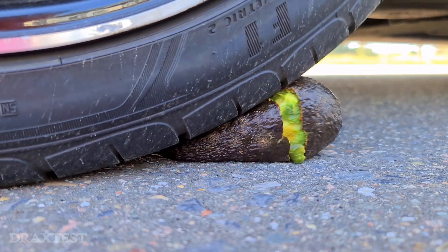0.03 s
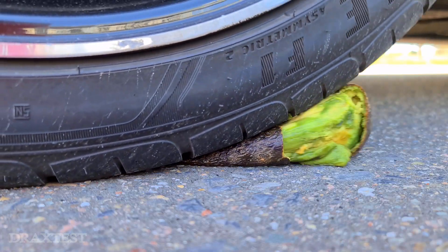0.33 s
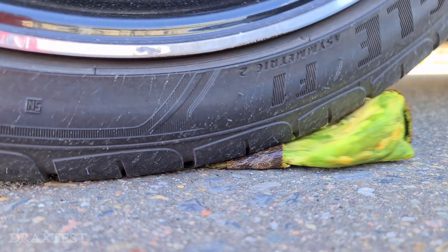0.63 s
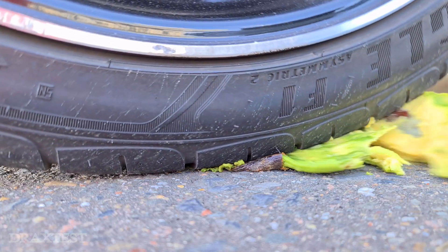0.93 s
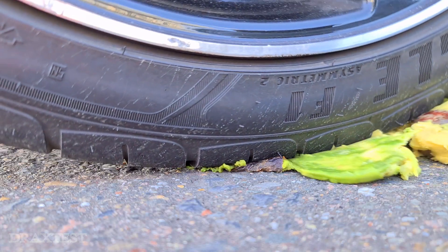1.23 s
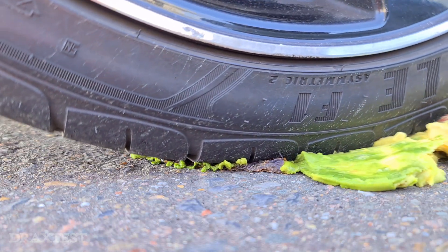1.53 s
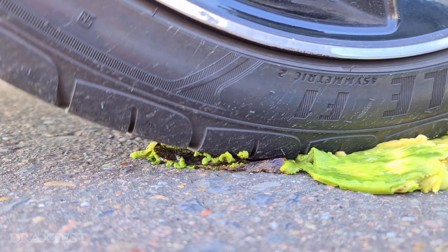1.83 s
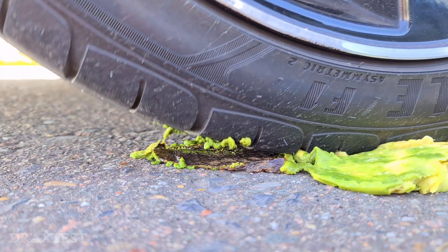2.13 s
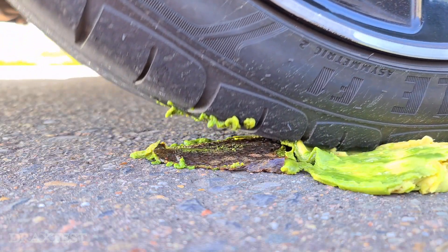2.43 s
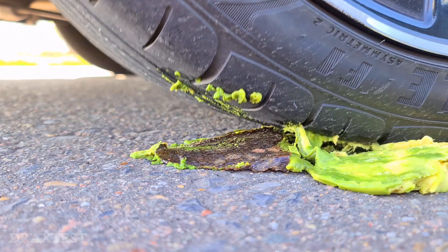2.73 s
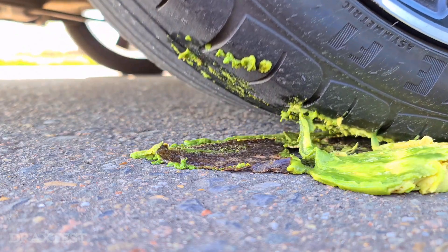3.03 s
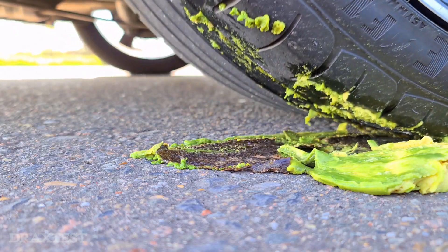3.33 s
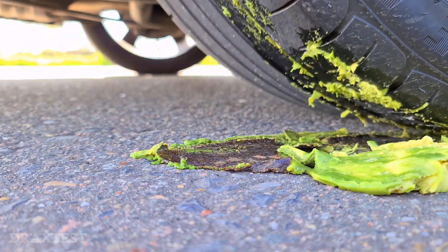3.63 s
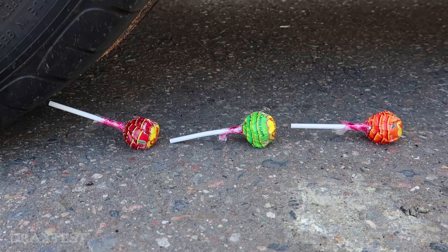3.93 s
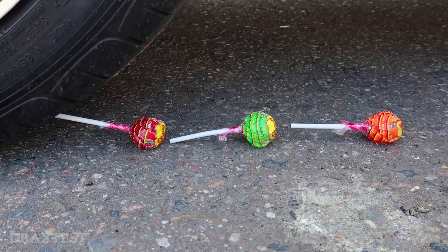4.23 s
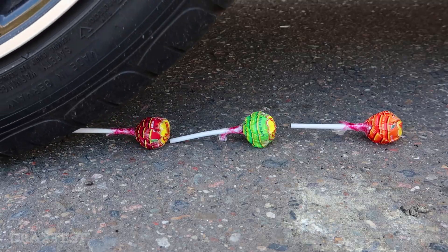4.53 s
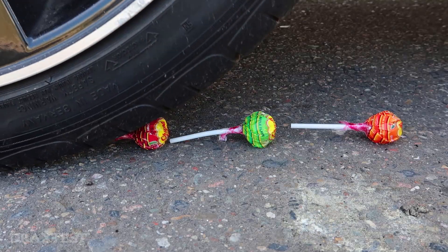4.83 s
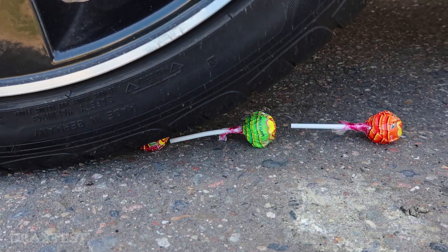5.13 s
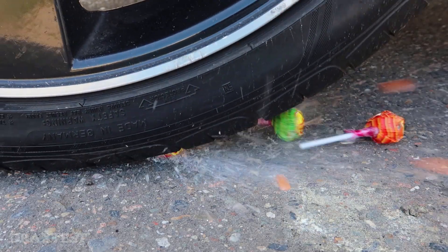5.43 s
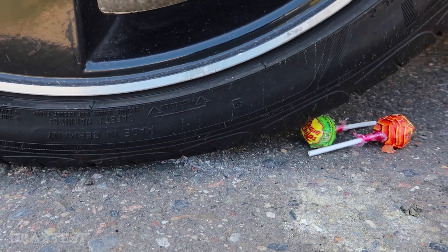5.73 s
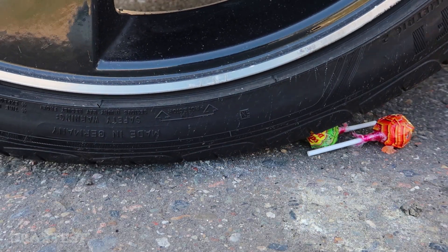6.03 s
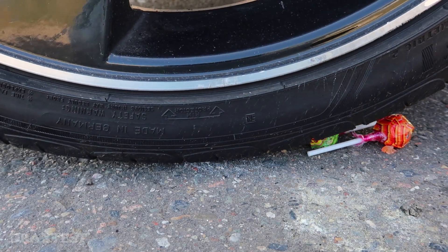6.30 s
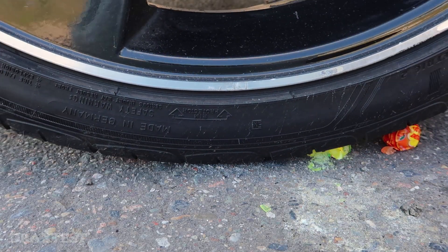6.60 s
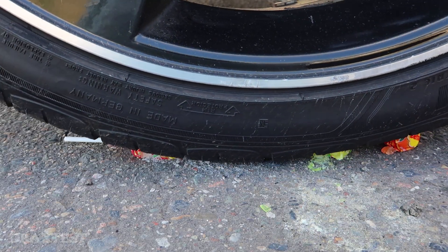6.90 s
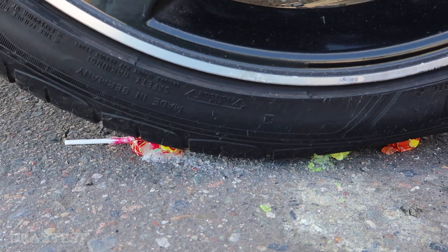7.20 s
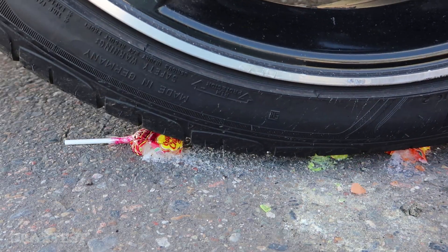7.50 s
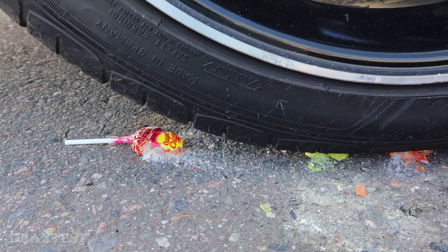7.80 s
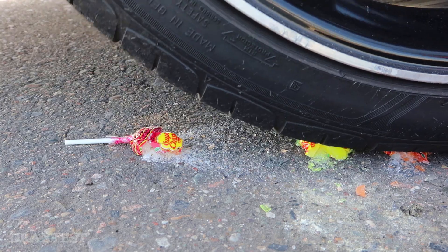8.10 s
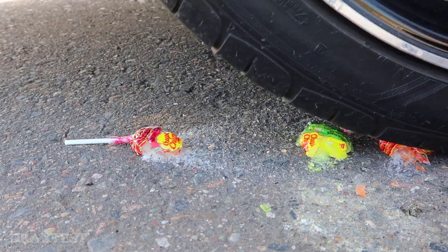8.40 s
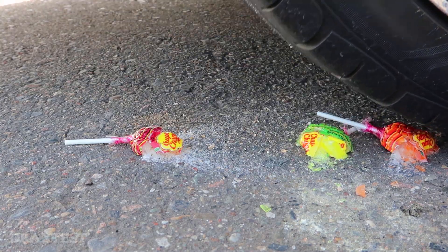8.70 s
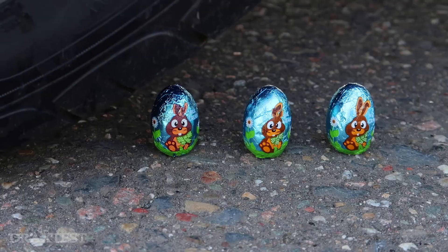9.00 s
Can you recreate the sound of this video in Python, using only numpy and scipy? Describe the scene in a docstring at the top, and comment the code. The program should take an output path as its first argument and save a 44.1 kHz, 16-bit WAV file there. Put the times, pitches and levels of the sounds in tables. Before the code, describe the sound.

A slow car tyre squelches over an avocado, then cracks and bursts wrapped lollipops with loud thumps, over a low engine rumble.

```python
"""A car crushes an avocado and lollipops

A car creeps over things laid on asphalt, heard from beside the tyre, in three parts.
First an avocado squelches and its pulp pops on the tread, over the hum of the engine.
Then three lollipops crack and burst in their wrappers; each burst thumps the tyre, rings it
and overloads the microphone. The last part is a brief rumble of the car."""
import sys
import numpy as np
from scipy import signal
from scipy.fft import rfft, irfft, next_fast_len
from scipy.io import wavfile
from scipy.ndimage import uniform_filter1d

SR = 44100
rng = np.random.default_rng(int(sys.argv[2]) if len(sys.argv) > 2 else 0)


def file_out(sig):
    """Save sig as 16-bit WAV at sys.argv[1]."""
    # one column per channel
    cols = np.atleast_2d(sig).T
    # limit, then scale
    lim = np.clip(cols, -1, 1)
    pcm = np.round(lim * 32767).astype(np.int16)
    wavfile.write(sys.argv[1], SR, pcm)


N = 403515
TIME = np.arange(N) / SR
SWEETS_START_S, ENDING_START_S = 3.99, 9.03
ENGINE_HZ = 25  # engine cycles per second

# Levels in the tables are relative: they compare rows; the functions set the final loudness.
# tone of the car and air noise (first part, two layers of the second, last part): f/Hz, level/dB
RUMBLE_TONE = [(15, -15), (30, -5.5), (45, -0.5), (62, 4), (85, -1.5), (125, -7.5), (160, -15.5),
               (330, -18), (750, -20), (1400, -30), (1800, -30), (2250, -38), (2700, -48), (6000, -57.5),
               (16000, -78)]
WASH_TONE = [(20, -30.5), (60, -5), (102, 2), (145, -4.5), (200, -5.5), (300, -8), (700, -7), (1200, -13),
             (1900, -21.5), (3900, -34.5), (12000, -48), (16000, -49.5)]
HUSH_TONE = [(20, -23.5), (60, -6.5), (105, -3), (200, -5), (400, -12), (800, -12.5), (1500, -25.5),
             (2700, -34.5), (5300, -45), (12000, -51.5), (16000, -61.5)]
ENDING_TONE = [(15, -54), (25, -33), (76, -0.5), (373, -1), (503, -16), (624, -5), (840, -17), (1130, -17),
               (11300, -59), (16000, -93)]
# the wash sinks after the first sweet bursts, then partly returns: t/s, level/dB
WASH_LEVEL = [(4.7, -0.4), (5.48, 2.5), (5.62, -18), (5.9, -28.5), (8.2, -28.5), (8.6, -12), (9.0, -12.5)]
# stereo width with the avocado and with the sweets: f/Hz, side minus middle/dB
AVOCADO_WIDTH = [(60, -25), (110, -25), (200, -11.5), (380, -13), (700, -1), (1290, 6), (2400, -4),
                 (8000, 2.5)]
SWEETS_WIDTH = [(200, -61), (380, -33.5), (700, -23.5), (1290, -11), (2380, -7.5), (4400, -0.5), (8000, 2)]
# tones of the engine: multiple of ENGINE_HZ, level/dB
HUM_TONES = [(4, -39.5), (5, -52.5), (8, -55.5), (10, -58), (12, -64)]
# faint whines of the car: f/Hz, level/dB, waver/Hz, start t/s
WHINES = [(1736, -65, 75, 0), (2150, -76, 108.5, -1), (2220, -68, 40, 2), (3760, -79, 55, 2.6)]
# the pulp fizzes less as it is squeezed flat: t/s, level/dB
FIZZ_LEVEL = [(0, -50), (.15, -55.5), (.9, -53), (1.1, -61.5), (2.25, -61), (2.55, -68), (3.15, -64),
              (3.5, -73.5), (3.9, -79)]
# tone of the fizzing and of the squelching pulp: f/Hz, level/dB
FIZZ_TONE = [(1000, -5), (2000, 9), (3000, -0.5), (4500, 2), (7000, -4.5), (12000, -2), (16000, -6)]
SQUELCH_TONE = [(500, -5), (1100, 6), (1800, 16.5), (2400, 13), (3200, -55), (8000, -40)]
# flesh squelches out of its skin, later off the tread: t/s, level/dB, rise/s, fall/s
SQUELCH_SWELLS = [(.3, -55, .5, 1.2), (.87, -48.5, 0.081, 0.27), (2.78, -54, .03, 0.07),
                  (3.13, -57, .03, .1), (3.7, -63, .4, 0.44)]
# larger air pockets popping in the pulp: t/s, level/dB, f/Hz, spray/dB
BIG_POPS = [(.0075, -23, 5400, -25), (.024, -14.5, 9600, -47), (.157, -29, 1850, -52),
            (.2013, -21.5, 13900, -48), (.2382, -26, 1790, -48), (.2619, -22.5, 11310, -42),
            (.5913, -26, 6400, -45), (.6673, -26.5, 11350, -40), (.6792, -27.5, 2200, -50),
            (.6885, -31, 6050, -46), (.7214, -27, 10450, -43), (.8488, -22.5, 11500, -44),
            (1.0111, -20, 8650, -32), (1.0304, -22.5, 10000, -57), (1.0736, -30, 1860, -55),
            (1.2022, -21, 10990, -52), (1.2428, -22, 6460, -34), (1.3789, -21, 3040, -39),
            (1.468, -30, 10350, -32), (1.9104, -27, 10000, -41), (2.0278, -23.5, 12120, -56),
            (2.1005, -38, 9720, -35), (2.146, -20.5, 6660, -48), (2.289, -26, 2560, -29.5),
            (2.3472, -27, 3900, -61), (2.5653, -25.5, 3020, -61), (2.753, -29.5, 4280, -44.5),
            (3.026, -33, 6840, -53), (3.1237, -40, 2560, -41.5), (3.525, -40, 2700, -48.5),
            (3.6833, -34.5, 8150, -44), (3.7198, -29, 9500, -36), (3.7987, -24, 1600, -37)]
# echoes under the car: f/Hz, time to fade by 60 dB/s
ECHO_FADE = [(150, 0.36), (400, 0.051), (1000, .11), (2500, 0.048), (6000, 0.061), (15000, 0.055)]
# the tread catches wrappers or lets them go: t/s, level/dB, rise/s, fall/s
WRAPPER_SWELLS = [(5.03, -50, 0.18, 0.92), (6.1, -71, .6, 0.84), (6.85, -58.5, 0.37, 0.27),
                  (7.57, -66, 0.23, 1.6), (8.25, -66.5, 0.63, 0.23), (8.61, -46.5, 0.047, 0.24)]
# the first sweet sheds powder inside its wrapper: t/s, level/dB, fall/s
POWDER_SPURTS = [(4.995, -40.5, 0.15), (5.11, -53, 0.034), (5.165, -41.5, 0.021), (5.305, -41, .24),
                 (5.47, -41, .05)]
# tone of the wrappers, the crumbling sugar and the powder: f/Hz, level/dB
WRAPPER_TONE = [(500, -12), (1100, 6), (2500, 5), (4000, 1), (7000, -7.5), (12000, -9), (16000, -25)]
SUGAR_TONE = [(400, -7), (1000, 4.5), (2400, 5.5), (4000, -5), (7000, -12.5), (16000, -27)]
SIZZLE_TONE = [(700, -10.5), (1500, -2), (3000, -1), (6000, -2), (13000, 0), (16000, -5.5)]
# hard sugar cracking: t/s, level/dB, f/Hz, splinters/dB, thud/dB
SUGAR_CRACKS = [(4.9787, -16.5, 1980, -40, -45), (5.1058, -15, 10200, -44, -58),
                (5.161, -18.5, 10200, -33, -49), (5.2979, -14.5, 2480, -13.5, -39),
                (5.3035, -18.5, 3220, -14, -39.5), (5.462, -18, 1240, -27, -36),
                (5.5516, -18, 2130, -38, -56), (5.5646, -13.5, 1020, -27.5, -58),
                (5.8151, -35, 1130, -47.5, -51.5), (6.0672, -3, 1083, -29, -31),
                (6.1393, -40, 2870, -46.5, -62), (6.4598, -28, 2490, -28, -35.5),
                (6.4988, -4.5, 990, -28.5, -18.5), (6.523, -21.5, 960, -38, -66.5),
                (6.6949, -16, 1770, -55, -37.5), (6.8946, -10.5, 1340, -41, -38.5),
                (6.956, -40.5, 3390, -44.5, -76), (6.995, -34.5, 2650, -46, -73),
                (7.1065, -36.5, 1670, -72.5, -76), (7.274, -36.5, 1870, -69, -66),
                (7.3934, -9.5, 1360, -22, -33.5), (7.5108, -31.5, 2180, -42, -66),
                (7.6678, -22, 1283, -50, -41), (7.6738, -26, 1900, -58, -65), (7.7524, -26, 1300, -56, -61),
                (7.8086, -25, 1440, -51, -61), (7.8535, -27, 1345, -49.5, -64),
                (7.9425, -29.5, 1530, -45, -54.5), (8.0265, -33.5, 4830, -57.5, -64),
                (8.1112, -30.5, 1040, -68, -68.5), (8.1711, -2.5, 1100, -30.5, -32.5),
                (8.3283, -21.5, 1290, -57, -53), (8.3428, -26.5, 1067, -64, -66),
                (8.4107, -10, 1330, -41, -28), (8.4469, -9, 1640, -33.5, -34),
                (8.4661, -4, 1090, -24.5, -19.5), (8.5109, -5, 1050, -37, -27.5),
                (8.5256, -2.5, 1180, -33, -23.5), (8.5342, -15.5, 1350, -46, -51.5),
                (8.5692, -22, 1300, -38, -72), (8.6336, -29, 3373, -36, -63),
                (8.7495, -33, 2527, -42.5, -72)]
# notes of the tyre's walls and the air inside: f/Hz, level/dB, time to fade by 60 dB/s
TYRE_NOTES = [(144, -15, 2.1), (208.7, 1, 0.64), (230, -13, 0.88), (298, -11, 1.4), (357, -9, 1.3),
              (399.6, 2.5, .42), (467, -1, 0.54), (583, 1, .48), (626, -16.5, .33), (711, -14, .48),
              (786, -.5, .6), (851, -10, .5), (925, -3, .55), (1123, -4, 0.41), (1325, -14.5, .24)]
# a sweet gives way and the tyre drops: t/s, level/dB, f/Hz, shards/dB, thud/dB, air push/dB, ring/dB
SWEET_BURSTS = [(5.2986, -9.5, 900, -25.5, -35.5, -45, -52), (5.4847, 6, 1094, -4, -17.5, -31, -26),
                (5.487, -0.5, 1330, -18, -20, -34.5, -35), (5.4930, 4.5, 540, -3.5, -9, -19.5, -23.5),
                (5.4962, 5.5, 1402, -17, -14, -20, -29.5), (5.499, 4.5, 417.3, -34.5, -5, -17, -21),
                (6.4681, 5, 923, -10, -12.5, -28, -25), (7.4177, 5, 997, -11, -24, -24, -42),
                (7.4178, 3, 474, -30, -19, -19.5, -21.5)]
# tone of the wedge of air between tyre and road: f/Hz, level/dB
WEDGE_TONE = [(150, 0), (210, 1), (300, 0), (440, 0), (650, 0.5), (1100, -2), (1700, -5.5), (2300, 1.5),
              (3050, 2), (3750, 2), (5000, -1.5), (9000, -2.5), (16000, 0.5)]
# the last cracks lie to the right: t/s, level gained right and lost left/dB
RIGHT_LEAN = [(7.5, 0), (8.15, .55)]


def gain_of(db):
    """Turns decibels into a factor to multiply by."""
    return 10 ** (np.asarray(db) / 20)


def read(points, hz):
    """Looks up a frequency in a table, on a scale of octaves."""
    freqs, values = np.transpose(points)
    return np.interp(np.log(hz + 1), np.log(freqs + 1), values)


def level(rows):
    """Turns rows of time and decibels into a gain for every sample."""
    return gain_of(np.interp(TIME, *np.transpose(rows)))


def between(start, end):
    """1 between two times and 0 outside, with short fades."""
    return uniform_filter1d(1. * ((TIME >= start) & (TIME < end)), size=400)


def swell(s, db, rise, fall, hold=0):
    """Climbs to db at time s, holds and sinks; rise and fall are the seconds for 20 dB."""
    away = np.maximum(s - TIME, 0) / rise + np.maximum(TIME - s - hold, 0) / fall
    return gain_of(db - 20 * np.minimum(away, 10))


def add(mix, s, sound):
    """Mixes a sound in at time s."""
    part = mix[:, max(round(s * SR), 0):][:, :sound.shape[-1]]
    part += sound[..., :part.shape[1]]


def drift(rate_hz):
    """A random wander with a typical size of 1."""
    knots = rng.standard_normal(4000)
    wander = np.interp(TIME * rate_hz, np.arange(len(knots)), knots)
    return wander / np.sqrt(np.mean(wander ** 2))


def coloured(pair, tone, width):
    """Shapes two unrelated signals into stereo: a middle both ears share and a side they hear opposed."""
    size = next_fast_len(N)
    hz = np.fft.rfftfreq(size, 1 / SR)
    mid_db = read(tone, hz)
    gains = gain_of([mid_db, mid_db + read(width, hz)])
    mid, side = irfft(rfft(pair, size) * gains, size)[:, :N]
    return np.array([mid + side, mid - side]) / np.std(mid)


def low_cut(x, hz):
    """Turns down what lies below hz."""
    return signal.sosfilt(signal.butter(2, hz, "high", fs=SR, output="sos"), x)


def snap(t, hz, cycles, rise):
    """A sudden release that swings briefly; its fade and rise are counted in cycles."""
    turns = np.maximum(t, 0) * hz
    swing = np.sin(2 * np.pi * turns) * np.exp(-turns / cycles) * (1 - np.exp(-turns / rise))
    return -swing / (abs(swing).max() + 1e-12)


def puff(t, low_hz, high_hz, decay_s, channels=1):
    """A dying burst of noise between two frequencies."""
    band = signal.butter(2, [low_hz, high_hz], "band", fs=SR, output="sos")
    noise = rng.standard_normal((channels, len(t)))
    return signal.sosfilt(band, noise * np.exp(-t / decay_s)) / np.sqrt(2 * (high_hz - low_hz) / SR)


def grains(per_s, spread_db, low_hz, high_hz, cycles):
    """Countless tiny snaps of many pitches, mostly faint, as middle and side."""
    t, out = np.arange(300) / SR, np.zeros((2, N))
    for hz in np.geomspace(low_hz, high_hz, num=16):
        when, chance, place = rng.random((3000, 3))[:int(per_s * N / SR / 16)].T
        size = gain_of(spread_db * np.minimum(-np.log(chance), 4))
        size *= rng.choice([-1, 1], 3000)[:len(size)]
        samples = (when * (N - len(t))).astype(int)[:, None] + np.arange(len(t))
        grain = snap(t, hz, cycles, rise=0.11) * hz
        for channel, share in enumerate([np.cos(np.pi * place), np.sin(np.pi * place)]):
            out[channel] += np.bincount(samples.ravel(), np.outer(size * share, grain).ravel(), N)
    return out


def sprinkle(start, end, per_s, db, spread_db, low_hz, high_hz):
    """Chance events over a stretch of time, as rows of t/s, level/dB, f/Hz."""
    when, chance, pitch = rng.random((200, 3))[:int(per_s * (end - start))].T
    times = start + (np.arange(len(when)) + when) / per_s
    levels = db + spread_db * np.minimum(-np.log(chance) - 1, 2)
    return zip(times, levels, low_hz * (high_hz / low_hz) ** pitch)


def echoes(x, stretch, width=SWEETS_WIDTH):
    """Sound bounces between road, tyre and car; stretch multiplies the time it takes to fade."""
    hz, t, bands = signal.stft(rng.standard_normal((2, SR // 3)), SR, nperseg=128)
    bands *= gain_of(-60 * t / (stretch * read(ECHO_FADE, hz)[:, None]))
    bands[1] *= gain_of(read(width, hz))[:, None]
    mid, side = signal.istft(bands, SR, nperseg=128)[1]
    tail = np.array([mid + side, mid - side]) / np.linalg.norm(mid)
    delayed = np.pad(tail, ((0, 0), (50, 0)))
    return signal.fftconvolve(x, delayed, axes=1)[:, :N]


def car_and_air():
    """The car and the open air rumble and hiss, with their own tone in each part."""
    def noise(tone, db, width=SWEETS_WIDTH):
        return gain_of(db) * coloured(rng.standard_normal((2, N)), tone, width)
    rumble = noise(RUMBLE_TONE, -39, AVOCADO_WIDTH) * gain_of(0.27 * drift(9.3))
    wash = noise(WASH_TONE, -40.5) * level(WASH_LEVEL) + noise(HUSH_TONE, -55.5)
    ending = noise(ENDING_TONE, -37)
    return (rumble * between(0, SWEETS_START_S)
            + wash * between(SWEETS_START_S, ENDING_START_S)
            + ending * between(ENDING_START_S, np.inf))


def engine():
    """The engine hums at multiples of its slightly unsteady cycle rate; thin whines waver above."""
    turns = np.cumsum(ENGINE_HZ * (1 + .004 * drift(5))) / SR
    hum = whine = 0
    for multiple, db in HUM_TONES:
        hum += gain_of(db + 1.2 * drift(9.2)) * np.sin(2 * np.pi * (multiple * turns + rng.random()))
    for hz, db, waver_hz, s in WHINES:
        phase = 2 * np.pi * np.cumsum(hz + waver_hz * drift(400)) / SR
        whine += gain_of(db) * np.sin(phase) * between(s, SWEETS_START_S)
    climb = swell(s=5, db=-5, rise=0.8, fall=0.02, hold=0.73)  # the tyre climbs the first sweet
    near = gain_of(1) * between(0, SWEETS_START_S)
    far = (gain_of(-22) + climb) * between(SWEETS_START_S, np.inf)
    return np.sqrt(2) * (hum * (near + far) + whine)


def avocado():
    """Wet pulp fizzes and squelches under the tread, and its air pockets pop."""
    t, pops = np.arange(SR // 30) / SR, np.zeros((2, N))
    oozing = sum(swell(*row) for row in SQUELCH_SWELLS)
    fizz = coloured(grains(2200, 5.8, 1800, 15000, cycles=1.1), FIZZ_TONE, AVOCADO_WIDTH)
    squelch = coloured(grains(1300, 4.5, 900, 2600, cycles=1.6), SQUELCH_TONE, AVOCADO_WIDTH)
    pockets = list(BIG_POPS)
    for s, db, hz in sprinkle(0.5, 7, per_s=15, db=22, spread_db=2, low_hz=1800, high_hz=13000):
        db += np.interp(s, *np.transpose(FIZZ_LEVEL))  # small pops follow the level of the fizz
        pockets.append((s, db, hz, db - 16))
    for s, db, hz, spray_db in pockets:
        lag_s = rng.uniform(0, 1e-4, (2, 1))  # reaches the two ears a little apart
        pop = gain_of(db) * snap(t - lag_s, hz, cycles=0.72, rise=0.17)
        spray = gain_of(spray_db) * puff(t, 3390, 15700, decay_s=0.00071, channels=2)
        add(pops, s, pop + spray)
    pulp = (fizz * level(FIZZ_LEVEL) + squelch * oozing) * between(0, SWEETS_START_S) + pops
    return pulp + gain_of(-6) * echoes(pulp, stretch=0.51, width=AVOCADO_WIDTH)


def grinding():
    """Wrappers crinkle as the tread rolls on; sugar crumbles after each break; its powder sizzles."""
    t, crumbling = np.arange(SR // 3) / SR, np.zeros((1, N))
    for s, db, *_ in SUGAR_CRACKS:
        add(crumbling, s, gain_of(db - 35.5) * np.exp(-t / .02))
    for s, _, _, shards_db, *_ in SWEET_BURSTS:  # shards skitter away
        add(crumbling, s, gain_of(shards_db - 33) * np.exp(-t / .04))
    grating = gain_of(-73) + sum(swell(*row) for row in WRAPPER_SWELLS)  # steady grit plus wrappers
    spurts = sum(swell(s, db, .015, fall) for s, db, fall in POWDER_SPURTS)
    crinkle = coloured(grains(1500, 6.5, 900, 15000, cycles=1.2), WRAPPER_TONE, SWEETS_WIDTH)
    crinkle *= grating * between(4.97, ENDING_START_S)
    sugar = coloured(grains(2500, 5, 700, 9000, cycles=1.2), SUGAR_TONE, SWEETS_WIDTH) * crumbling
    powder = coloured(grains(4500, 4.5, 900, 15000, cycles=1), SIZZLE_TONE, SWEETS_WIDTH) * spurts
    return gain_of(-4.5) * crinkle + gain_of(-7.5) * echoes(crinkle, stretch=0.63) + sugar + powder


def cracks():
    """Sugar snaps, muffled by the rubber, with sharp splinters and a small thud that rings the tyre."""
    t, out = np.arange(SR // 2) / SR, np.zeros((2, N))
    brief = t[:SR // 15]
    for s, db, hz, splinter_db, thud_db in SUGAR_CRACKS:
        splinters = puff(brief, 1800, 6000, decay_s=0.002)
        splinters = splinters + 0.53 * puff(brief, 3500, 13000, decay_s=0.002, channels=2)
        crack = gain_of(db) * snap(brief, hz, cycles=.9, rise=.35) + gain_of(splinter_db) * splinters
        thud = gain_of(thud_db) * puff(brief, 200, 520, decay_s=0.012)
        add(out, s, crack + thud)
        add(out, s, gain_of(-15) * echoes(crack, stretch=.85))
        add(out, s, gain_of(thud_db) * 0.39 * tyre_ring(t))
    return low_cut(out, hz=98)


def tyre_ring(t):
    """The struck tyre rings; each note's strength varies by chance, as with where a blow lands."""
    ring = 0
    for hz, db, fade_s in TYRE_NOTES:
        strength = gain_of(db + 1.7 * rng.standard_normal() - 60 * t / fade_s)
        ring += strength * np.sin(2 * np.pi * (hz * t + rng.random()))
    attack = 1 - np.exp(-t / .003)
    return ring * attack / np.sqrt(len(TYRE_NOTES))


def air_wedge(x):
    """The gap between tyre and road colours the sound that leaves through it."""
    log_gain = np.log(gain_of(read(WEDGE_TONE, abs(np.fft.fftfreq(2048, 1 / SR)))))
    response = np.exp(np.conj(signal.hilbert(log_gain)))  # nothing rings early, so snaps stay sharp
    taps = np.fft.ifft(response).real[:1024]
    return signal.oaconvolve(x, taps[None])[:, :N]


def bursts():
    """A sweet collapses: a heavy blow, a spray of shards, and the tyre thuds down and rings."""
    t, out = np.arange(SR) / SR, np.zeros((2, N))
    for s, db, hz, shards_db, thud_db, push_db, ring_db in SWEET_BURSTS:
        blow = gain_of(db) * snap(t, hz, cycles=1.1, rise=.3)
        coarse = puff(t, 810, 2400, decay_s=0.0035)
        fine = puff(t, 2500, 10000, decay_s=0.0046, channels=2)
        shards = gain_of(shards_db) * (coarse + 0.34 * fine)
        tread_flex = snap(t, hz=226, cycles=1.8, rise=0.14) + 0.87 * puff(t, 170, 520, decay_s=0.016)
        air_push = snap(t, hz=86, cycles=.45, rise=0.05)  # air squeezed out as the tyre drops
        thud = gain_of(thud_db) * tread_flex + gain_of(push_db) * air_push
        add(out, s, blow + shards + thud + gain_of(ring_db) * tyre_ring(t))
        add(out, s, gain_of(-12) * echoes(blow + shards, stretch=1))
        add(out, s, gain_of(-24.5) * echoes(shards, stretch=9.2))  # the surroundings answer faintly
    return low_cut(out, hz=38)


def crumb_snaps():
    """Loose crumbs snap one by one, too small to ring the tyre."""
    t, out = np.arange(SR // 30) / SR, np.zeros((2, N))
    for s, db, hz in sprinkle(6.5, 9.5, per_s=24, db=-49, spread_db=4.5, low_hz=1298, high_hz=4600):
        splinters = gain_of(-11) * puff(t, 2077, 8000, decay_s=0.0023, channels=2)
        add(out, s, gain_of(db) * (snap(t, hz, cycles=0.7, rise=0.41) + splinters))
    return out + gain_of(-14.5) * echoes(out, stretch=0.83)


def scene():
    """Everything heard beside the tyre, mixed in stereo."""
    mix = car_and_air() + engine() + grinding()
    breaking = air_wedge(cracks() + bursts() + crumb_snaps())
    right = level(RIGHT_LEAN)
    return mix + np.array([1 / right, right]) * breaking + avocado()


def record(dry):
    """The first part leans slightly right, the bursts overload and clip, and the top treble is cut."""
    lean_db = np.array([[-0.49], [0.49]]) * between(0, SWEETS_START_S)
    clipped = np.clip(dry * gain_of(lean_db), -1, 1)
    treble_cut = signal.firwin(255, cutoff=16200, window=("kaiser", 8), fs=SR)
    return signal.oaconvolve(clipped, treble_cut[None], "same")


dry = scene()
out = record(dry)
file_out(out)
```